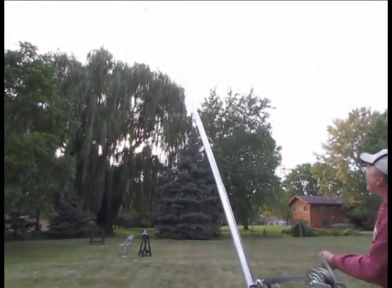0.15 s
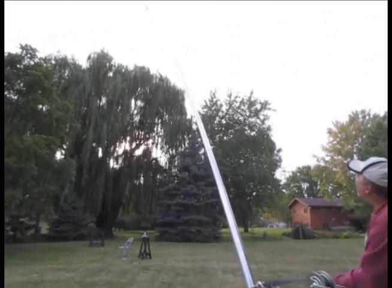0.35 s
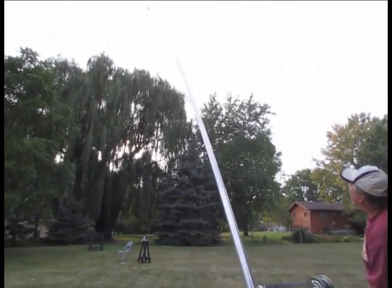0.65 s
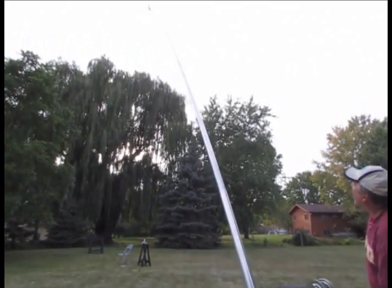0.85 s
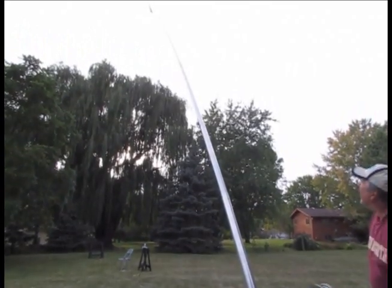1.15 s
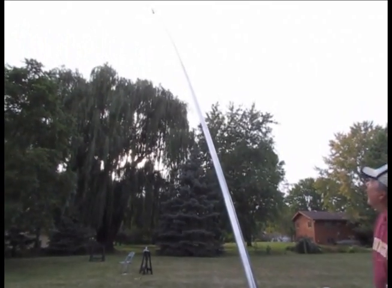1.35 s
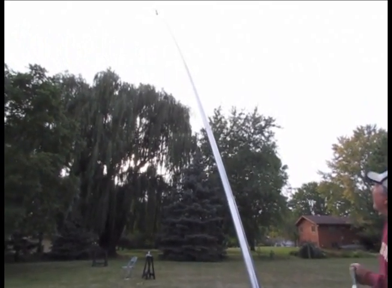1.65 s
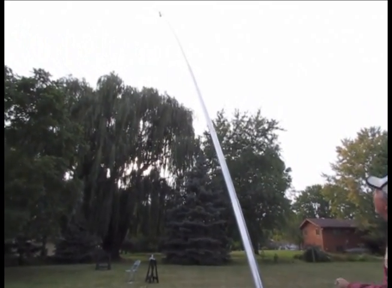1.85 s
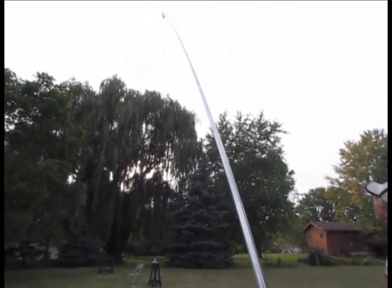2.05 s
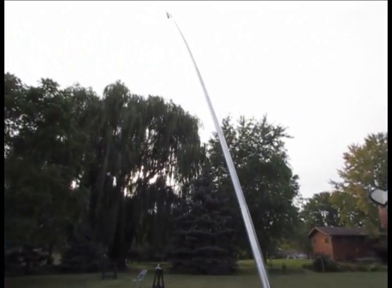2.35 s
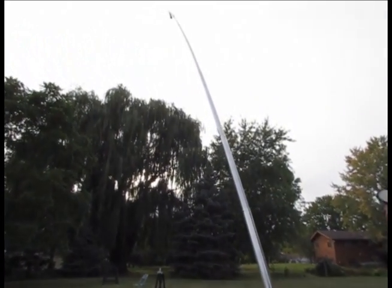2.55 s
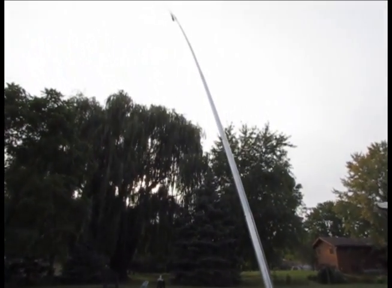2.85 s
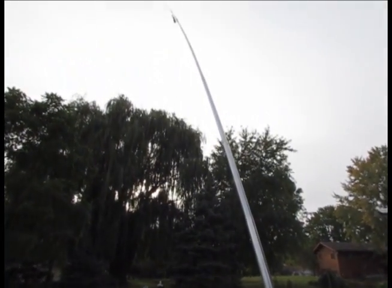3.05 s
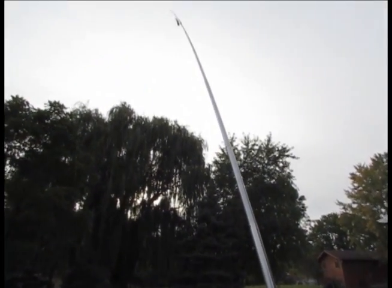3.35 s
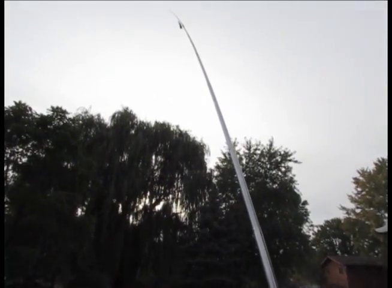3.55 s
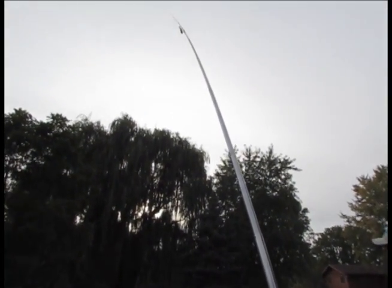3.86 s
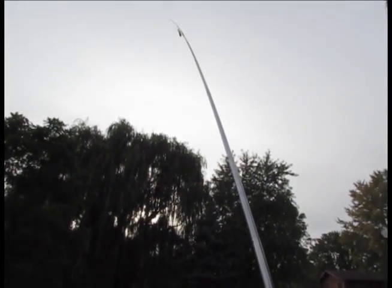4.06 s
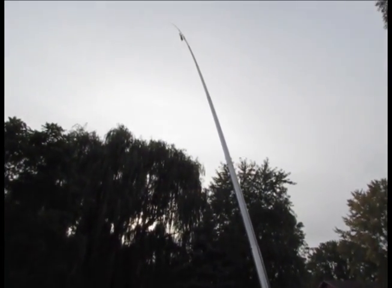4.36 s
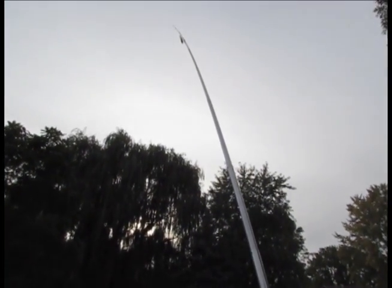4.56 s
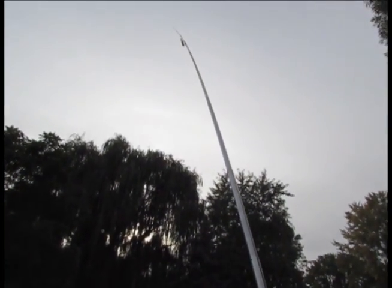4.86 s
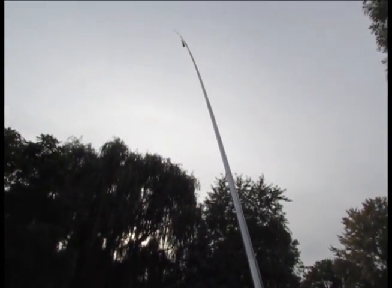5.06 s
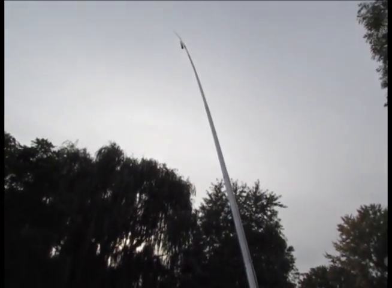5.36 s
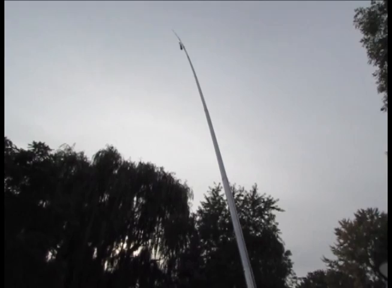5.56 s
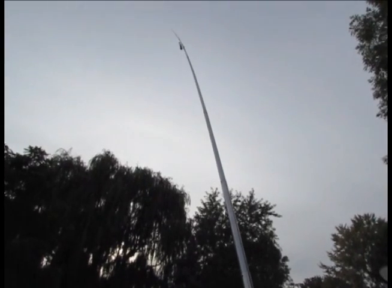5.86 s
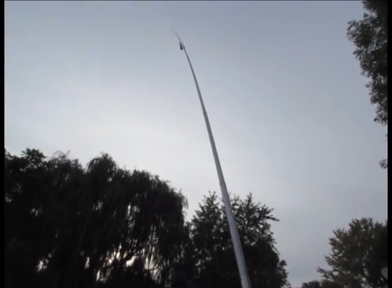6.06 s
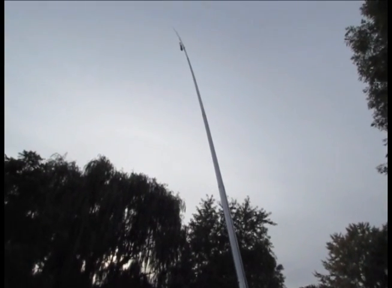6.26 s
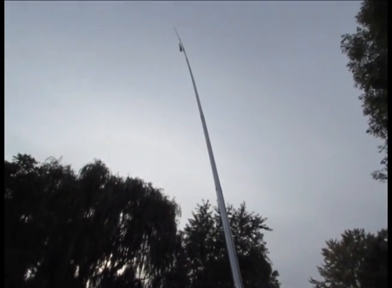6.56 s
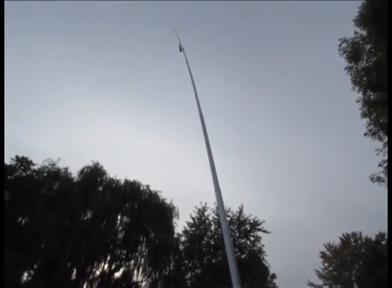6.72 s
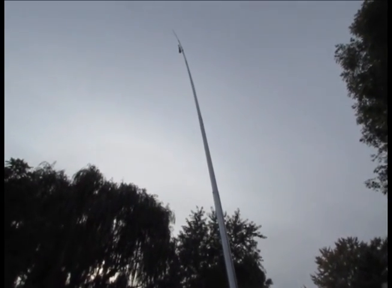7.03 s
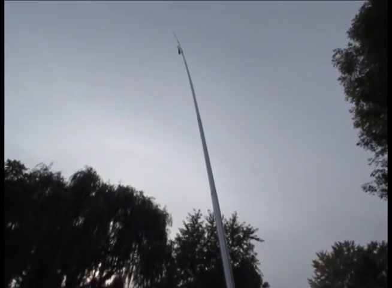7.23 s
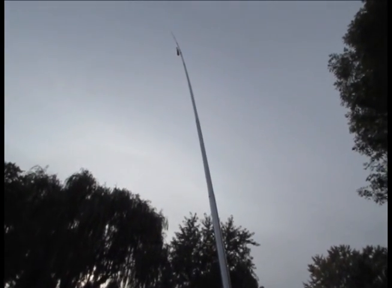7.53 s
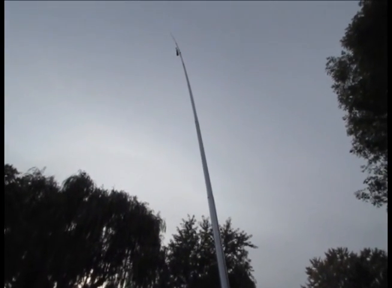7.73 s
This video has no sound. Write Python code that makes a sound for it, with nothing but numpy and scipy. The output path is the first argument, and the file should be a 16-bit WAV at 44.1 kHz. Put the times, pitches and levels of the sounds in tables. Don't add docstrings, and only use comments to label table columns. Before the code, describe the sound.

Continuous ratchet clatter in a yard, starting almost at once and still going at the end. Each click is a tiny slip tick, then a hard bright crack and chatter of loose steel parts, with little bass. The first couple of seconds are crispest; then the treble softens as the camera turns away, and more drum ring shows. Quiet air hiss and a barely audible engine sit far behind, with faint reflections from ground, wall and trees.

```python
import sys
import numpy as np
from scipy import signal
from scipy.fft import rfft, irfft
from scipy.io import wavfile
from scipy.ndimage import uniform_filter1d

SR = 44100
rng = np.random.default_rng(int(sys.argv[2]) if len(sys.argv) > 2 else 0)


def waveform_to_disk(signal):
    frames = np.transpose(np.atleast_2d(signal))
    scaled = np.clip(frames, -1, 1) * 32767
    samples = np.round(scaled).astype(np.int16)
    wavfile.write(sys.argv[1], SR, samples)


def level_to_linear(level):
    exponent = np.asarray(level, float) / 20
    return 10 ** exponent


N = 347949
FALL_ROOM = 520

# pitch_hz, likeness (0..1)
LIKENESS = [(300, 1), (1000, 1), (2800, 0.57), (5000, 0.61), (9000, 0.67), (14000, 0.55)]
# pitch_hz, phase_rad
LEFT_PHASE = [(200, 0), (1120, -.25), (1700, -.5), (2700, -1.), (3600, -1.1), (4300, -.3), (7000, -.2),
              (15000, 0)]


def evened(x):
    return x / np.sqrt(np.mean(x ** 2, -1, keepdims=True) + 1e-20)


def read(points, hz):
    f, value = np.transpose(points)
    return np.interp(np.log(hz + 1), np.log(f + 1), value)


def over_time(points, s):
    return np.interp(s, *np.transpose(points))


def add(mix, s, sound):
    part = mix[..., round(s * SR):][..., :sound.shape[-1]]
    part += sound[..., :part.shape[-1]]


def air(shape, same, patchy_db):
    frames, hz = N // 512 + 5, np.fft.rfftfreq(2048, 1 / SR)
    a, b, c, d, patches = rng.standard_normal((frames, 1025, 5)).T
    patches = evened(uniform_filter1d(uniform_filter1d(patches, 16, 0), 8, 1))
    same = np.clip(same, 0, 1)
    left = a + 1j * b
    right = same * left + np.sqrt(1 - same ** 2) * (c + 1j * d)
    z = np.array([left, right]) * level_to_linear(read(shape, hz)[:, None] + patchy_db * patches)
    return evened(signal.istft(z, nperseg=2048, noverlap=1536)[1][:, :N])


def hush():
    # pitch_hz, level_db per Hz
    colour = [(20, -12), (50, 0), (100, 4), (200, 1), (310, 5.5), (500, -1), (900, -2.5), (1900, -2),
              (4500, 4), (8000, -0.5), (13000, -7.5), (14500, -29), (15500, -70)]
    # start_s, level_db
    swell = [(0, -66), (3, -70), (5.5, -66.5), (7.89, -70.5)]
    return level_to_linear(over_time(swell, np.arange(N) / SR) + 12.5) * air(colour, .8, patchy_db=1.8)


def hum():
    # start_s, pitch_hz, level_db
    engine = [(0, 103.8, -76), (1.2, 100.6, -71), (3.2, 96.5, -74), (4.7, 91.4, -83), (7.89, 92.8, -83)]
    s, hz, db = np.transpose(engine)
    t = np.arange(N) / SR
    wobble = rng.standard_normal((2, N))
    wobble = evened(uniform_filter1d(uniform_filter1d(wobble, size=1500), size=1500))
    carrier = np.exp(2j * np.pi * np.cumsum(np.interp(t, s, hz)) / SR)
    fuzz = .7 + .6 * (wobble[0] + 1j * wobble[1])
    return level_to_linear(np.interp(t, s, db)) * (fuzz * carrier).real


def train(at, size):
    rows = np.zeros((len(at), 4096))
    np.add.at(rows, (np.arange(len(at))[:, None], np.clip(at, 0, 3000).astype(int)), size)
    return rfft(rows)


def causal(db):
    fold = np.r_[1, 2 * np.ones(db.shape[-1] - 2), 1]
    cepstrum = irfft(db * np.log(10) / 20)[..., :db.shape[-1]]
    return np.exp(rfft(cepstrum * fold, 2 * db.shape[-1] - 2))


def left_port(right, other, hz):
    same = np.clip(read(LIKENESS, hz), 0, 1)
    return (same * right + np.sqrt(1 - same ** 2) * other) * np.exp(1j * read(LEFT_PHASE, hz))


def rattle(length_ms, hz, fall, slip_db, count=46):
    place, size, sign = np.moveaxis(rng.random((len(length_ms), 3 * count, 3)), 2, 0)
    size = level_to_linear(-14. * size) * np.sign(sign - .5)
    span = np.clip(1.3 * length_ms, 2, 30)[:, None] * SR / 1000
    hard = ((np.arange(count) + place[:, :count]) / count) ** 1.2
    chatter_size = level_to_linear(-8. * hard) * np.minimum(0.22 + 5.7 * hard, 1)
    chatter = train(FALL_ROOM + hard * span, size[:, :count] * chatter_size)
    crack_db, crack_hz = 1, 12000
    crack = train(FALL_ROOM + hard[:, 1:6] * span, size[:, -5:] * level_to_linear(crack_db))
    crack /= (1 - 1j * crack_hz / (hz + 1)) ** 3
    late = place[:, count:]
    buzz = train(FALL_ROOM + span * .8 + 900. * late, size[:, count:] * level_to_linear(-6.0 - 25.7 * late))
    near, after = late[:, :12], late[:, 12:20]
    slip = train(FALL_ROOM - 300 * near ** 2, size[:, :12] * level_to_linear(-10. - 18. * near))
    slip += train(FALL_ROOM - fall * (1 - after ** 2), size[:, 12:20] * level_to_linear(slip_db - 10 * after))
    return chatter + crack + buzz / (1 + 1j * hz / 9000) + slip / (1 + 1j * hz / 5000) ** 3


def mode_weights(count, modes, spread_db):
    hz = np.transpose(modes)[0]
    level, turn_a, turn_b = np.moveaxis(rng.standard_normal((count, len(hz), 3)), 2, 0)
    right, other = np.exp(4j * turn_a), np.exp(4j * turn_b)
    return np.stack([left_port(right, other, hz), right], 1) * level_to_linear(spread_db * level)[:, None]


def struck(modes, weights, size):
    hz, db, t60 = (c[:, None] for c in np.transpose(modes))
    t = np.arange(size) / SR
    return (weights @ (level_to_linear(db - 60 * t / t60) * np.exp(2j * np.pi * hz * t))).imag


def ratchet():
    # start_s, blow_db, rattle_length_ms
    turn_1 = [(0.0629, -17.5, 8.6), (0.1836, -18.5, 7.3), (0.2987, -18.5, 4), (0.4029, -19.5, 7.9),
              (0.5152, -20, 9.5), (0.6101, -19.5, 7.2), (0.7045, -19, 12.7), (0.8391, -18, 8.8),
              (0.9861, -17.5, 11.6), (1.1166, -18.5, 8.1), (1.2338, -17, 7.9), (1.3381, -18.5, 9.3),
              (1.4465, -18, 6.8), (1.5642, -18.5, 8.1), (1.6818, -18, 8.5)]
    turn_2 = [(1.7924, -19, 9.8), (1.8953, -20, 8.9), (2.003, -20.5, 9.5), (2.099, -19, 9.6),
              (2.1977, -19.5, 10.4), (2.3048, -18.5, 9.5), (2.396, -18, 10.4), (2.5066, -18, 9.8),
              (2.6351, -19, 8.15), (2.7636, -19.5, 9.6), (2.8887, -19.5, 9.5), (2.9995, -19.5, 6.47),
              (3.1086, -19, 9.4), (3.2417, -21, 7.2), (3.3512, -20.5, 9.4)]
    turn_3 = [(3.4516, -20, 9.2), (3.5439, -21, 9.5), (3.63, -20, 10.1), (3.713, -19.5, 10.9),
              (3.7965, -19, 10.7), (3.8885, -19.5, 9.6), (3.9888, -20, 11.2), (4.114, -19.5, 12.6),
              (4.2533, -20.5, 11.2), (4.382, -20.5, 12.7), (4.4956, -19, 8.5), (4.5988, -19.5, 11.3),
              (4.6985, -19.5, 7.2), (4.8203, -20.5, 8.9), (4.937, -20, 9.3)]
    turn_4 = [(5.0536, -20, 13.6), (5.1629, -18.5, 10.8), (5.273, -20, 9.1), (5.3861, -19, 8.1),
              (5.511, -18, 9.7), (5.6306, -17.5, 11.3), (5.7431, -17.5, 8.6), (5.8836, -18.5, 13.6),
              (6.046, -18.5, 9.3), (6.1954, -19, 10.2), (6.3465, -18.5, 11.4), (6.4946, -19.5, 7.6),
              (6.6365, -19, 7.6), (6.7828, -20, 11.8), (6.9104, -19, 9.8)]
    turn_5 = [(7.027, -20.5, 7.5), (7.1525, -21.5, 7.1), (7.2787, -21, 7.96), (7.4119, -21.5, 10.8),
              (7.5588, -21, 8.2), (7.7097, -20.5, 8.14), (7.8536, -19.5, 7.7)]
    # thud_db, low_clank_db, brightness_db, drum_ring_db
    wheel = [(-1, -0.5, -4.5, 3.5), (-7, 2, -1.5, 2.5), (-10.5, 1.5, 0, 3), (-7.5, 0.5, 1, -6),
             (1.5, 0.5, -2, 3), (-0.5, 1, 2, -5), (5.5, -4.5, -3, -2), (5.5, -4, -2, -7),
             (6.5, -3, -2.5, -0.5), (-6.5, 3, 2, 4), (-5.5, 3, 1.5, 3), (-10, 6, -1.5, -20),
             (-4, 3, -6, -9), (-3.5, 2.5, 4, 1.5), (-10, 2, 0.5, 2.5)]
    # pitch_hz, level_db
    frame = [(300, -30.5), (600, -26), (1000, -16.5), (1900, -11), (2500, -4.5), (5500, 1.5), (8000, -1),
             (11500, -6), (12800, -3), (14600, -10.5), (15400, -19), (16000, -33), (17000, -55)]
    # pitch_hz, width_hz, level_db
    frame_peaks = [(752, 177, 15), (1502, 400, 10.5), (2327, 374, 6.5), (2773, 216, 9.5), (3882, 365, 7.5),
                   (4818, 140, 7), (5574, 240, 5), (6320, 1280, 4.5), (7310, 280, 3.5), (9050, 120, 6),
                   (9895, 890, 5)]
    # pitch_hz, level_db, t60_s
    rings = [(750, -39, .08), (1424, -29, .14), (1540, -33, .08), (1975, -40, .15), (2955, -34, .3),
             (3140, -33, .45), (4078, -33, .33), (4665, -29.5, .4), (5482, -30, .16), (6360, -38, .2),
             (6490, -33, .16), (7210, -40, .2), (8590, -39, .16), (9210, -39, .16), (9900, -32, .18),
             (10930, -42, .16), (13520, -41, .2)]
    # start_s, ring_db
    drum_lay = [(0, -11), (1.2, 9.5), (3.7, 11), (5.2, 9), (7.89, 7)]
    # start_s, level_db
    tip_tick = [(0, -20), (2.6, -18), (3.2, -13.5), (5.2, -13.5), (5.6, -22), (7.89, -19)]
    # start_s, top_level_db
    treble = [(0, 9), (1.4, 9), (2.3, 1), (7.89, -2)]
    # start_s, left_right_db
    pan = [(0, -1), (2.9, -3.8), (4.2, -3.5), (5.7, -2), (7.89, -1)]

    s, blow_db, length_ms = np.transpose(turn_1 + turn_2 + turn_3 + turn_4 + turn_5)
    tooth = np.arange(len(s)) % len(wheel)
    thud_db, low_db, bright_db, drum_db = np.array(wheel)[tooth].T[..., None]

    hz = np.fft.rfftfreq(4096, 1 / SR)
    colour = read(frame, hz) + sum(db / (1 + (2 * (hz - f) / w) ** 2) for f, w, db in frame_peaks)
    lean_db = low_db / (1 + (hz / 1800) ** 4) + bright_db * hz ** 4 / (hz ** 4 + 13400.0 ** 4)
    thud_hz, thud_width_hz = 700, 91
    lean_db += thud_db / (1 + (2 * (hz - thud_hz) / thud_width_hz) ** 2)
    lean_db += over_time(treble, s)[:, None] * hz ** 6 / (hz ** 6 + 10500. ** 6)
    modes = uniform_filter1d(uniform_filter1d(rng.standard_normal(lean_db.shape), size=11), size=11)
    tooth_share = 0.24
    lean_db += 2.1 * evened(modes + tooth_share * modes[::-1][tooth])

    early, firm = rng.uniform(-1, 1, (len(s), 2, 1)).transpose(1, 0, 2)
    fall_ms, fall_spread_ms, slip_spread_db = 7.5, 3.5, 4.5
    fall = (fall_ms + fall_spread_ms * early) * SR / 1000
    slip_db = over_time(tip_tick, s)[:, None] + slip_spread_db * firm
    right, other = rattle(length_ms, hz, fall, slip_db), rattle(length_ms, hz, fall, slip_db)
    left = left_port(right, other, hz)
    shade = 0.1 + 0.99 / (1 + np.log(hz / 3500 + 1e-3) ** 4 * 0.73)
    left *= level_to_linear(np.outer(over_time(pan, s), shade))
    clank = irfft(np.stack([left, right], 1) * causal(colour + lean_db)[:, None])
    clank /= np.sqrt((clank ** 2).sum((1, 2), keepdims=True) / 1800)

    drum_db = drum_db + over_time(drum_lay, s)[:, None]
    drum = level_to_linear(drum_db * (np.arange(len(rings)) == 1))[:, None]
    ring = struck(rings, mode_weights(len(s), rings, 2.8) * drum, size=16000)
    ring *= np.minimum(np.arange(16000) / 350., 1)

    gain = level_to_linear(blow_db[:, None] - 2.0)[..., None]
    out = np.zeros((2, N))
    for k, start in enumerate(s):
        add(out, start - FALL_ROOM / SR, gain[k] * clank[k])
        add(out, start, gain[k] * ring[k])
    return signal.sosfilt(signal.butter(3, 450, "high", fs=SR, output="sos"), out)


def handle():
    # start_s, level_db, pitch_hz
    knocks = [
        (.606, -39, 480),
        (1.232, -52, 330),
        (4.597, -34, 500),
    ]
    out, t = np.zeros(N), np.arange(3000) / SR
    for s, db, hz in knocks:
        pair = sum(np.sin(2 * np.pi * share * hz * t) for share in (.85, 1.12))
        soft_onset = np.minimum(t / .004, 1) ** 2
        add(out, s, level_to_linear(db - 60 * t / .045) * pair * soft_onset)
    return out


def yard(x, count=3):
    # pitch_hz, t60_s
    tail_t60 = [(500, 0.35), (2000, 0.16), (6000, 0.16), (15000, 0.21)]
    # delay_s, level_db
    echoes = [
        (.024, -52),
        (.036, -52),
        (.093, -33),
        (.102, -48),
    ]
    common, own = rng.standard_normal((count, 1, SR // 2)), rng.standard_normal((count, 2, SR // 2))
    hz, t, z = signal.stft(common + 0.67 * own, SR, nperseg=256)
    z *= level_to_linear(-60 * t / read(tail_t60, hz)[:, None]) * np.minimum(t / 0.0025, 1)
    z /= 1 + (hz[:, None] / 14700) ** 40
    tails = signal.istft(z, SR, nperseg=256)[1]
    tails *= level_to_linear(-11.0) / np.linalg.norm(tails[0, 0])
    smear = rng.standard_normal((len(echoes), count, 1, 200)) * np.exp(-np.arange(200) / 60.)
    smear = uniform_filter1d(smear, size=4)
    for (s, db), puff in zip(echoes, smear):
        add(tails, s, level_to_linear(db) * puff / np.linalg.norm(puff[0]))
    turn = np.pi * (2.7 * np.arange(N) / SR + np.arange(count)[:, None] / count)
    fed = x.mean(0) * np.sin(turn) * np.sqrt(2 / count)
    return signal.fftconvolve(fed[:, None], tails, axes=2)[..., :N].sum(0)


def scene():
    winch = ratchet() + handle()
    return winch + yard(winch) + hush() + hum()


def narrowed(dry):
    wide_hz, band_hz, keep_band, keep_frame, kept_db = 4500, 450, .3, .3, 2.5
    mid, side = (dry[0] + dry[1]) / 2, (dry[0] - dry[1]) / 2
    hz, t, z = signal.stft(side, SR, nperseg=1024)
    draw = rng.random((len(t) // 3 + 1, 60))[np.arange(len(t)) // 3].T
    kept = (draw[(hz / band_hz).astype(int)] < keep_band) | (draw[-1] < keep_frame)
    z = z * np.where(hz[:, None] < wide_hz, 1, kept * level_to_linear(kept_db))
    side = signal.istft(z, SR, nperseg=1024)[1][:N]
    return np.array([mid + side, mid - side])


def low_pass(x):
    return signal.sosfilt(signal.butter(12, 16500, fs=SR, output="sos"), x)


def record(dry):
    return low_pass(narrowed(dry))


dry = scene()
out = record(dry)
waveform_to_disk(out)
```